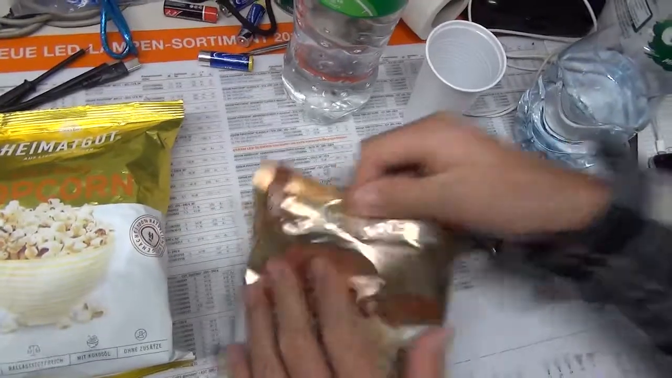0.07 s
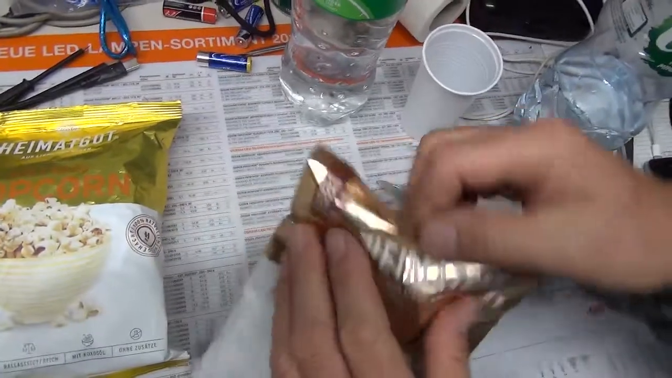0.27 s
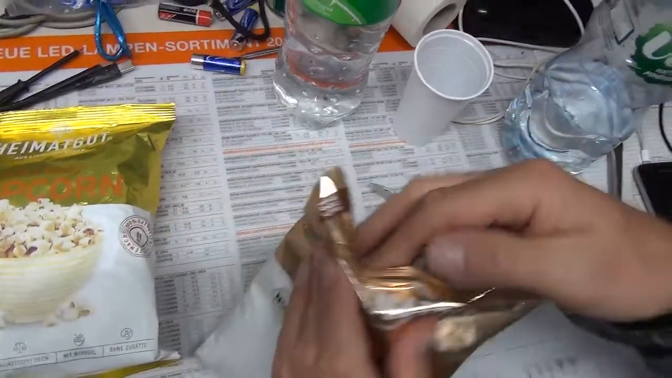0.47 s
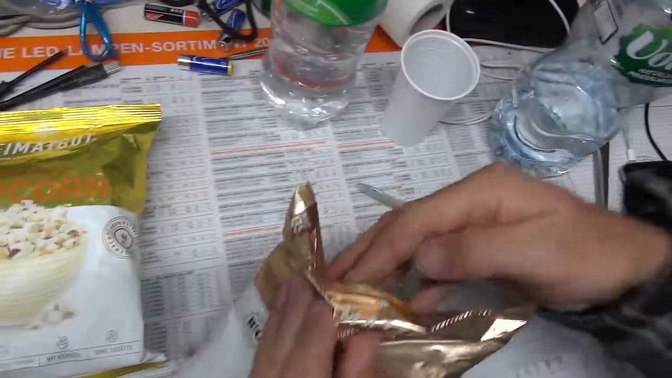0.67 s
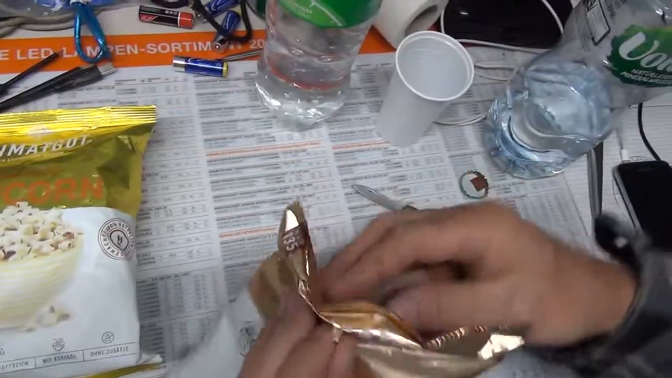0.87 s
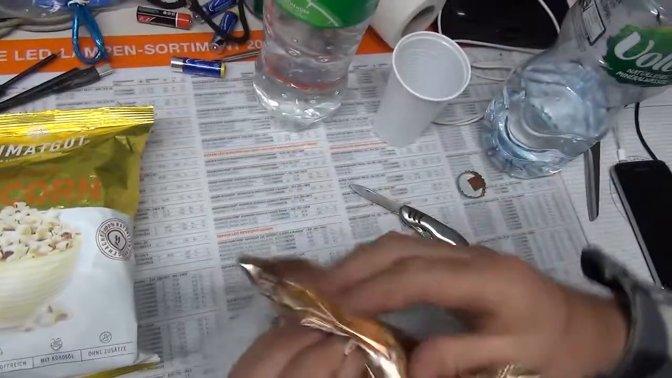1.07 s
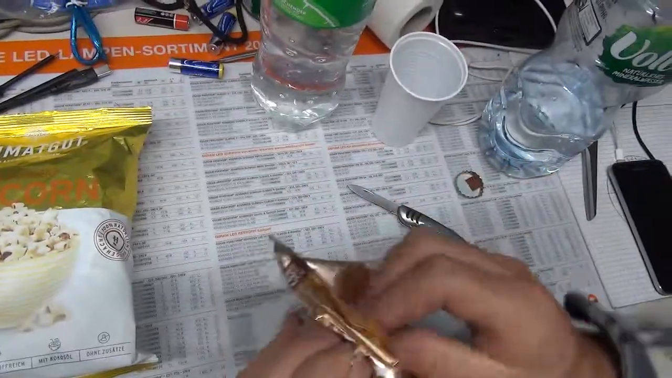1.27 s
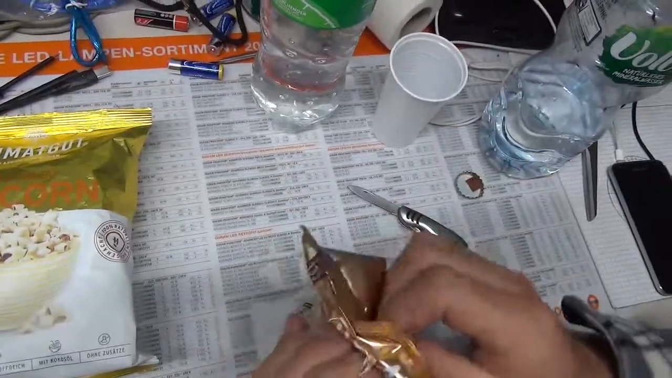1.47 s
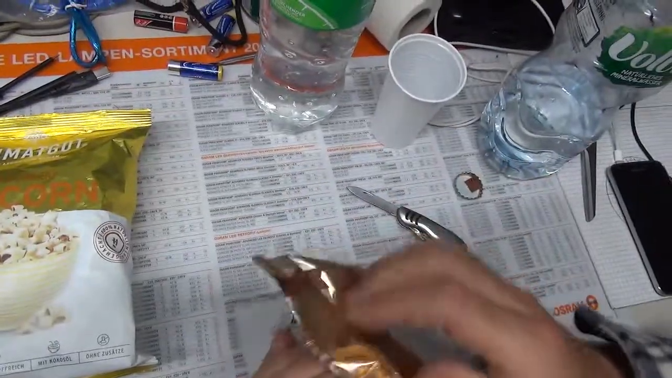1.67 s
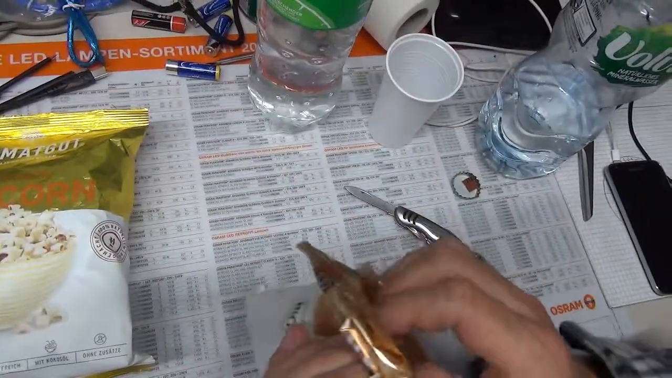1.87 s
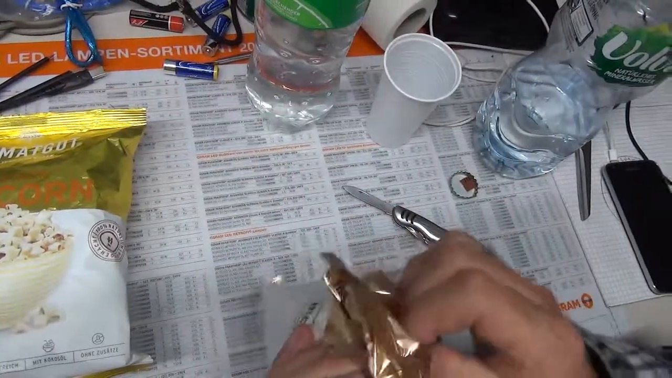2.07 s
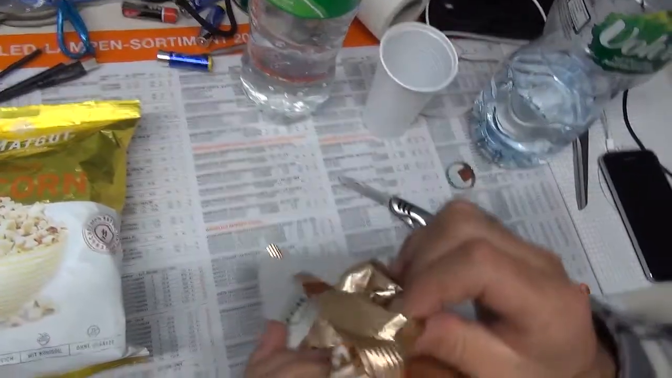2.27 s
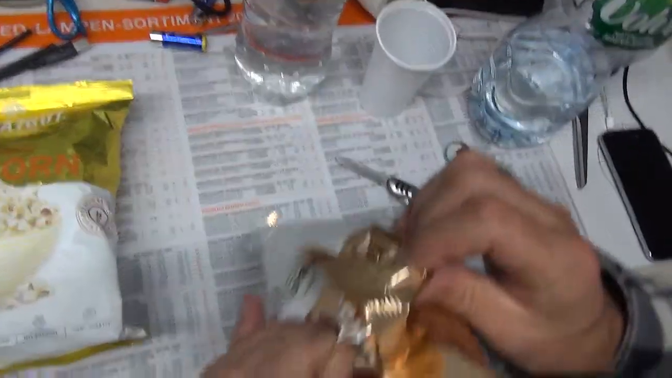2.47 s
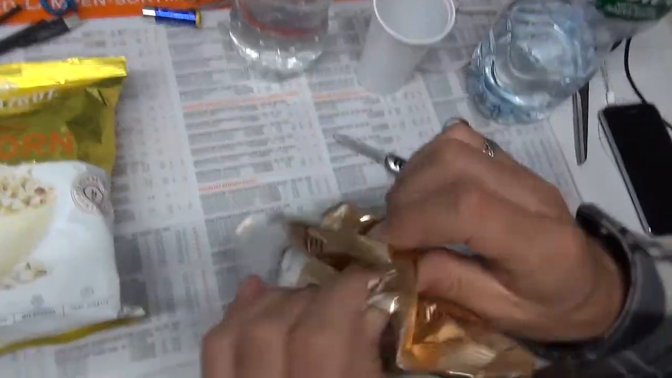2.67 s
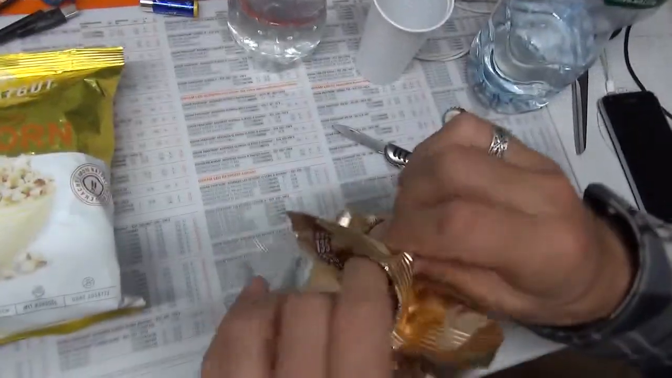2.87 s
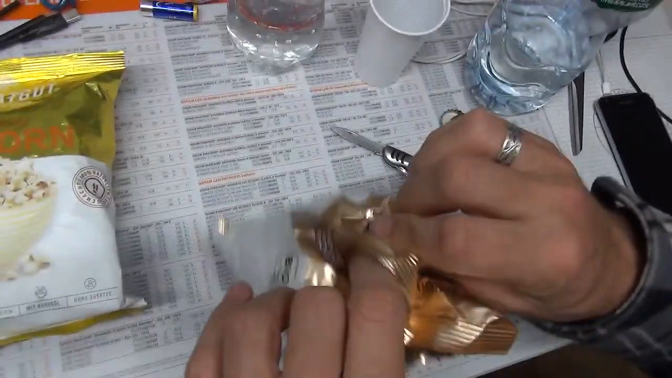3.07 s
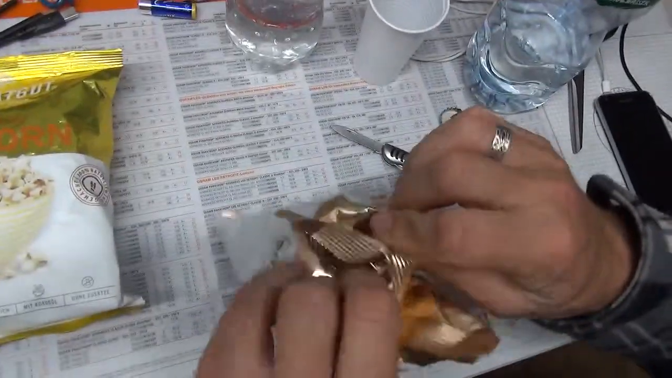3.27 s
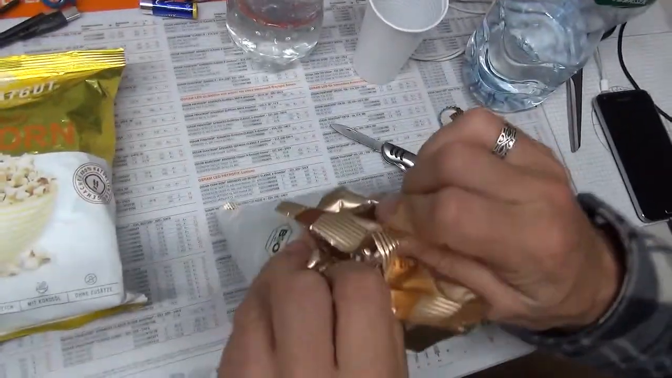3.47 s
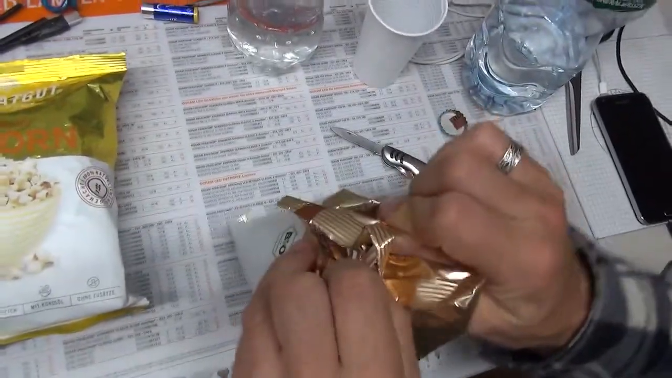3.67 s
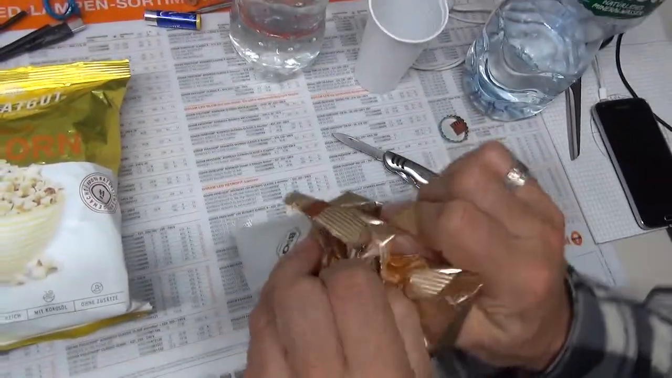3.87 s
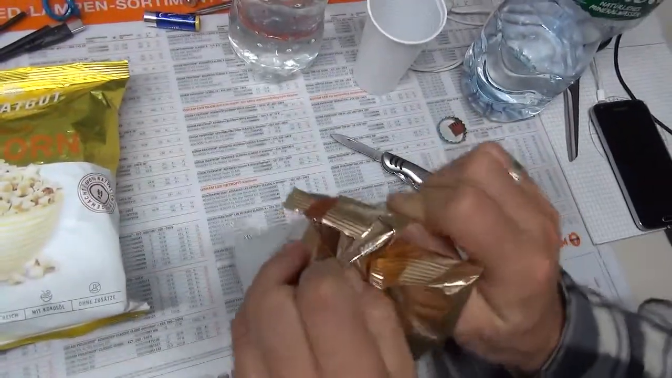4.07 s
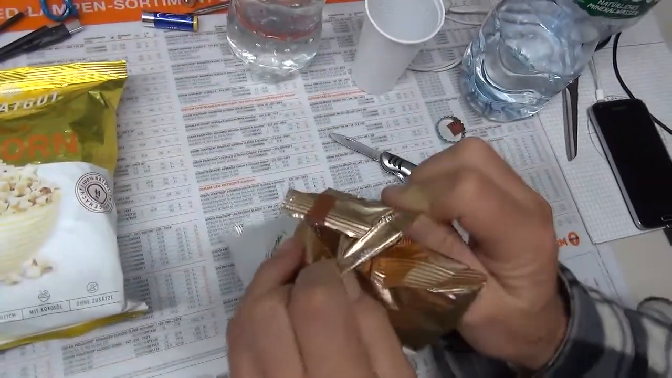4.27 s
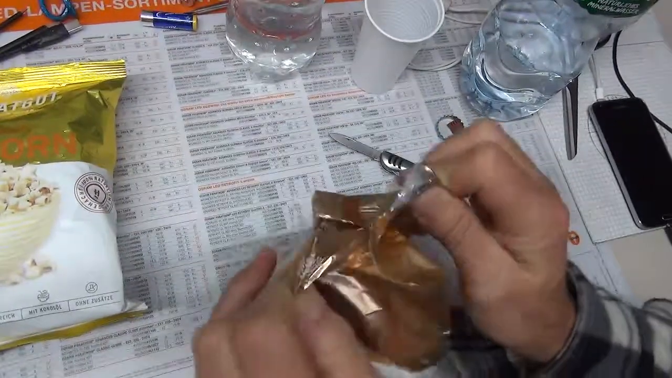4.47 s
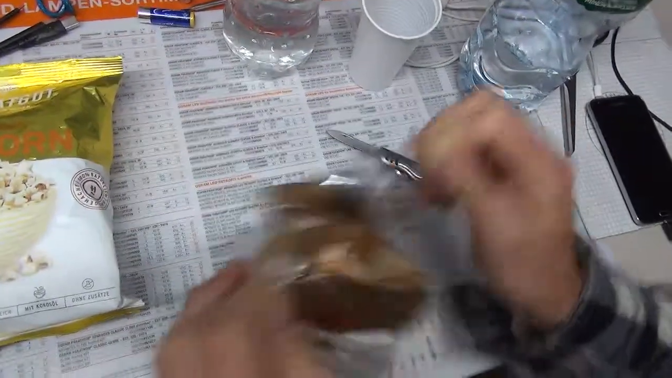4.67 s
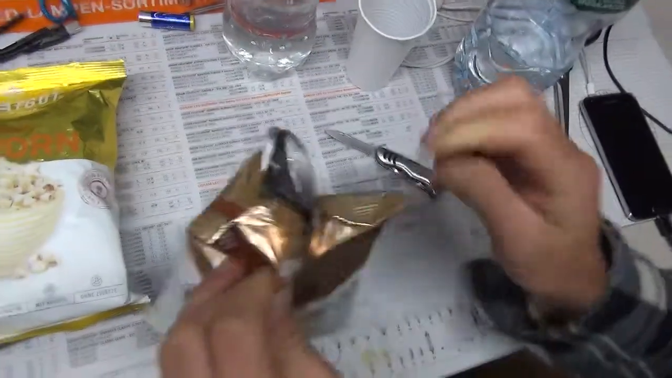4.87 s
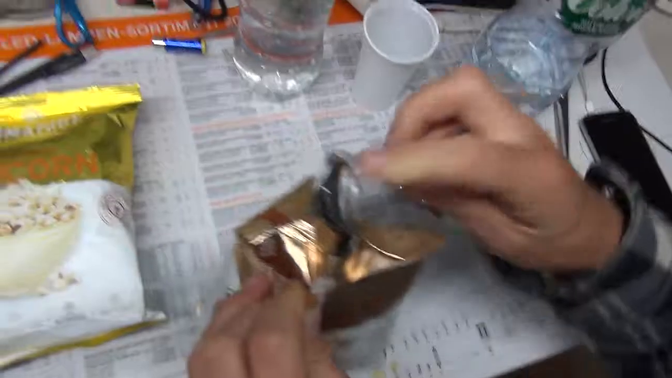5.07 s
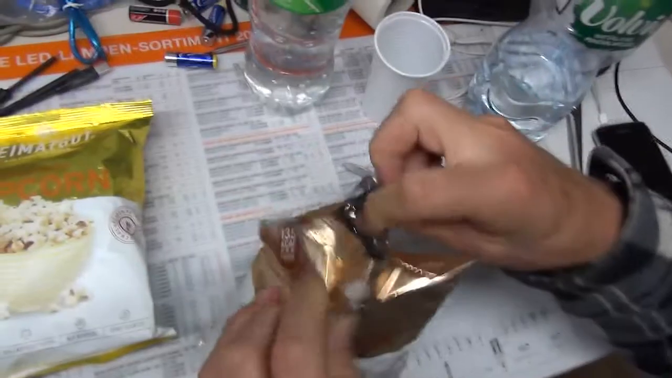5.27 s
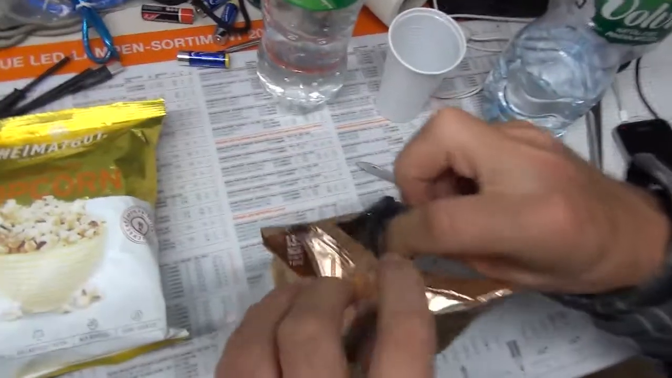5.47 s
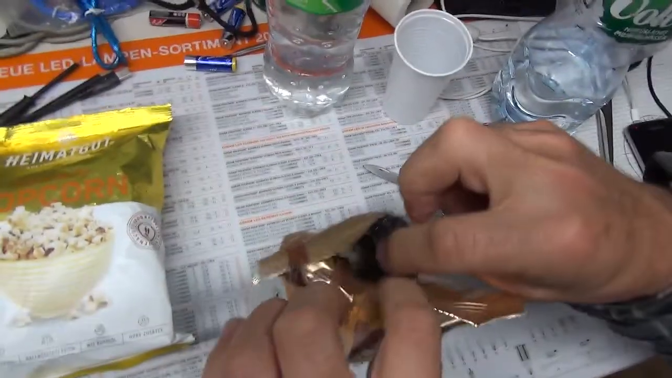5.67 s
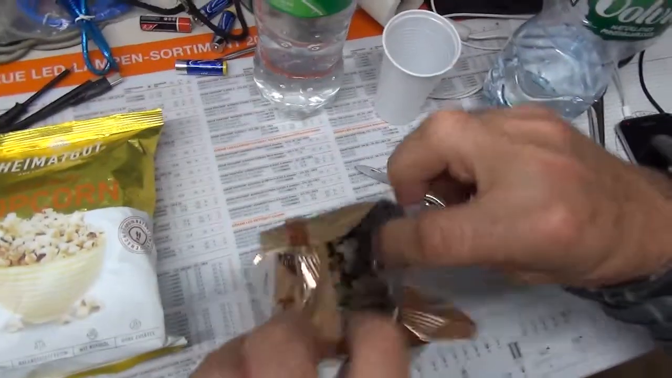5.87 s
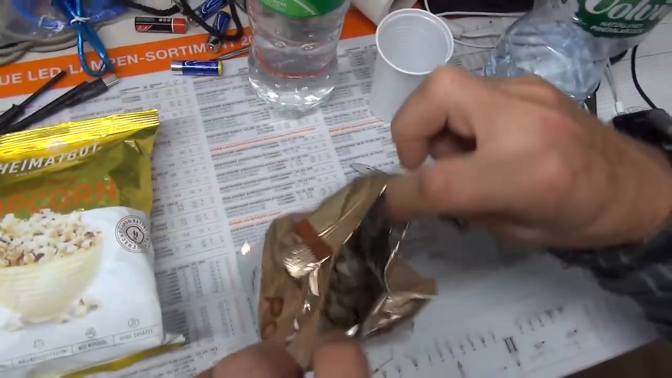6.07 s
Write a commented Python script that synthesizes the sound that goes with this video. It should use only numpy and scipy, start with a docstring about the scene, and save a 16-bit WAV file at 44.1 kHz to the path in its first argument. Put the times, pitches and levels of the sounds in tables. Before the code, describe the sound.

Close, crisp crinkling of a foil bag being squeezed and pulled open by hand, with small dull pops, in a quiet room.

```python
"""Crumpling a foil bag

Two hands crumple and open a metallised foil bag on a table, close by. Creases snap over in clumps,
each with its own colour and a short rattle, over the hiss of sliding foil. Larger panels pop dully
and knuckles bump the table. A small furnished room answers above its quiet background."""
import sys
import numpy as np
from scipy import signal
from scipy.fft import rfft, irfft
from scipy.io import wavfile
from scipy.ndimage import uniform_filter1d

SR = 44100
rng = np.random.default_rng(int(sys.argv[2]) if len(sys.argv) > 2 else 0)


def generate_wav(sig):
    """Save sig (samples, or channels by samples) to the path in sys.argv[1] as 16-bit PCM at SR."""
    pcm = np.round(np.clip(np.atleast_2d(sig).T, -1, 1) * 32767).astype(np.int16)
    wavfile.write(sys.argv[1], SR, pcm)


N = 270492

# Bag panels popping in or out: start_s, level_db, pitch_hz
PANEL_POPS = [(0.051, -16.5, 211), (0.0875, -14, 478), (0.1174, -14, 1940), (0.151, -18, 457),
              (0.2072, -17, 194), (0.2493, -16, 1320), (0.262, -16, 620), (0.3586, -14, 459.3),
              (0.9267, -18, 1945), (1.0403, -15.5, 415.4), (1.4214, -24, 2433), (1.8145, -19, 1489),
              (1.9084, -13, 660.5), (1.928, -16, 592.5), (2.086, -15.5, 663), (2.2359, -20.5, 190.6),
              (2.2926, -16, 176), (2.3758, -17, 325.7), (2.3971, -15.5, 190.5), (2.437, -17.5, 355),
              (2.49, -20, 3036), (2.5239, -14, 2570), (2.602, -18, 2088), (2.6547, -18.5, 149.3),
              (2.7419, -18, 2676), (2.9994, -18, 410.4), (3.012, -20, 1345), (3.1538, -14, 1449),
              (3.294, -14.5, 279.6), (3.3788, -18.5, 2832), (3.424, -13, 322.3), (3.4326, -16, 2870),
              (3.516, -21, 1509), (3.5448, -19, 1596), (3.546, -13, 463.2), (3.6585, -15.5, 742),
              (3.6848, -11, 641), (3.7239, -18, 3360), (3.8072, -17, 1940), (3.8086, -15.5, 373.2),
              (3.835, -17, 371), (3.8433, -14.5, 1329), (3.9861, -14, 3285), (4.071, -11.5, 2066),
              (4.212, -16, 336), (4.3223, -18.5, 209.6), (4.424, -13.5, 1309), (4.4351, -21, 145.6),
              (4.5787, -18.5, 1523), (4.815, -14.5, 1640), (4.818, -17, 239.8), (4.9612, -16.5, 190.8),
              (5.1419, -18, 1348), (5.2758, -22, 1367), (5.4415, -23, 153.2), (5.447, -15.5, 2090),
              (5.66, -17, 2260), (5.664, -24, 149.3), (5.8878, -20, 193.2), (5.96, -20, 170.9)]
# Hand action, sliding to pulling: time_s, snaps_per_s, avalanche_share, slide_db, size_range_db
HAND_GRIP = [(0, 1416, 0.25, -3, 20), (1.5, 1400, 0.3, -3.5, 19), (3, 650, 0.6, -6, 19),
             (4, 600, 0.65, -6, 18), (5.0, 1100, .6, 0, 10), (5.6, 1300, .6, 3, 9),
             (6.13, 800, 0.5, -2, 18)]

SIDE_DB, BASS_SIDE_HZ = -13.5, 69  # stereo width; snaps widen towards the bass


def from_db(db):
    """dB to gain."""
    return 10 ** (np.asarray(db) / 20)


def colour(x, spectrum):
    """Unit-energy minimum-phase filter from rows of freq_hz, level_db."""
    hz, db = np.transpose(spectrum)
    grid_hz = np.linspace(1, SR / 2, 4097)
    cepstrum = irfft(np.interp(np.log(grid_hz), np.log(hz), db) * np.log(10) / 20)
    cepstrum[1:4096] *= 2
    cepstrum[4097:] = 0
    kernel = irfft(np.exp(rfft(cepstrum)))[:4096]
    return signal.fftconvolve(x, kernel[None] / np.linalg.norm(kernel), axes=1)[:, :N]


def butterworth(x, order, edges_hz, kind):
    """Causal Butterworth filter."""
    return signal.sosfilt(signal.butter(order, edges_hz, kind, fs=SR, output="sos"), x)


def background():
    """Steady room noise, strongest near 950 Hz. Rows: left, right."""
    # Room noise spectrum: freq_hz, level_db
    spectrum = [(18, -68), (30, -36), (802, 0), (953, 6.5), (1250, -8), (1640, -17), (3620, -17),
                (11000, -12), (14300, -33), (22000, -120)]
    mid, side = colour(rng.standard_normal((2, N)), spectrum)
    return from_db(-53.5) * (mid + 0.43 * side * [[1], [-1]])


def room(x, t60_s=0.25, level_db=-18, gap_s=0.003):
    """Diffuse reflections: a tail of decaying noise."""
    time = np.arange(SR // 2) / SR
    tail = rng.standard_normal(len(time)) * from_db(-60 * time / t60_s) * (time > gap_s)
    return signal.fftconvolve(x, from_db(level_db) * tail / np.linalg.norm(tail))[:N]


def table_bumps(contact_s=0.002):
    """Each soft contact pushes the table with one rounded pulse."""
    # Hands and bag meeting the table top: start_s, level_db
    contacts = [(0.049, -41), (0.805, -36), (1.236, -36), (2.582, -43), (2.689, -47), (3.428, -49),
                (3.696, -45), (3.862, -46), (3.939, -43), (4.019, -44), (4.414, -40)]
    start_s, level_db = np.transpose(contacts)
    impulses = np.zeros(N)
    impulses[(start_s * SR).astype(int)] = from_db(level_db)
    age = np.arange(2000) / SR / contact_s
    push = np.convolve(impulses, age * np.exp(1 - age))[:N]
    return 2 * butterworth(push, 1, 35, "high")


def panel_pops(overtone_ratio=2.264, overtone_db=-7.5, crack_db=-8, crack_s=0.0015):
    """A panel flips: its fold cracks and it rings a few cycles at its own pitch."""
    length = 4000
    out, time = np.zeros(N + length), np.arange(length) / SR
    cracks = butterworth(rng.standard_normal((len(PANEL_POPS), length)), 2, [600, 6000], "band")
    cracks *= from_db(crack_db) * np.exp(-time / crack_s)
    for (start_s, level_db, pitch_hz), crack in zip(PANEL_POPS, cracks):
        cycles = pitch_hz * time
        phase = 2 * np.pi * (cycles + 0.17 * (1 - np.exp(-cycles / 0.29)))  # tension drops after the flip
        ring = np.sin(phase) + from_db(overtone_db) * np.sin(overtone_ratio * phase)
        t60_s = 5 / pitch_hz + 0.009
        envelope = (1 - np.exp(-cycles / 0.15)) * from_db(-60 * time / t60_s)
        at = round(start_s * SR)
        out[at:at + length] += from_db(level_db) * (envelope * ring + crack)
    return butterworth(out[:N], 2, 100, "high")  # a small bag radiates no deep bass


def handling(ramp_s=0.0077, mean_crackle_db=-14.5, low_fade_db_per_s=0.7156):
    """Hand effort over time: crackle level, lift of the lower bands, squeezes' part of the level."""
    # How busy the hands are: time_s, level_db
    effort = [(0, -14.5), (0.48, -17), (0.56, -24), (0.8, -21), (0.9, -16.5), (2.0, -14.5), (2.9, -18),
              (3.3, -19.5), (3.95, -20.5), (4.05, -20), (4.5, -28.5), (4.75, -20), (4.98, -32.5),
              (5.2, -29), (5.42, -27.5), (5.6, -33), (5.78, -23), (6.13, -16)]
    # Squeezes crushing many creases at once: start_s, length_s, rise_db
    squeezes = [(1.0, 0.12, 3), (1.215, 0.054, 2), (1.36, 0.067, 4), (1.905, 0.041, 3), (2.01, .035, 3.5),
                (2.28, 0.043, 3), (2.775, 0.065, 5.5), (3.07, 0.066, 7), (3.215, 0.048, 9.5),
                (3.79, 0.027, 6.5), (3.89, 0.093, 5), (4.322, .11, 12.5), (4.66, 0.031, 3),
                (4.806, .014, 9), (5.445, 0.0052, 7.5), (5.66, 0.017, 5)]
    # Foil held still: start_s, length_s, drop_db
    rests = [(0.125, 0.02, 9), (0.788, 0.034, 5), (1.5, 0.044, 11.5), (1.635, 0.02, 5.5), (2.056, 0.022, 5),
             (2.164, 0.044, 7), (2.24, 0.022, 7), (2.415, 0.027, 8), (2.749, 0.0092, 3),
             (2.846, 0.037, 6.5), (2.99, 0.018, 3), (3.022, 0.032, 8.5), (4.558, 0.0077, 18),
             (4.862, 0.018, 13), (5.007, 0.13, 17), (5.723, 0.033, 11), (6.034, 0.027, 7),
             (6.089, .008, 12)]
    time = np.arange(N) / SR

    def plateaus(rows):
        return sum(db * np.interp(time, [s - ramp_s, s, s + length, s + length + ramp_s], [0, 1, 1, 0])
                   for s, length, db in rows)

    squeeze_db = plateaus(squeezes)
    crackle_db = np.interp(time, *np.transpose(effort)) + squeeze_db - plateaus(rests)
    # Lower bands fade as the bag gets smaller, and follow only part of each swing.
    lift_db = -0.22 - low_fade_db_per_s * time
    lift_db -= 0.41 * (crackle_db - mean_crackle_db) + 0.1 * squeeze_db
    return crackle_db, lift_db, squeeze_db


def avalanches(trigger_at, random_per_s=32, decay_s=0.0065):
    """One buckle sets off its neighbours: the snap rate jumps, then decays. Mean 1."""
    starts = 1.0 * (rng.random(N) < random_per_s / SR)
    starts[trigger_at] = 1
    surge = signal.lfilter([1], [1, -np.exp(-1 / (decay_s * SR))], starts)
    return surge / surge.mean()


def creases(ticks=3, run_s=0.002, loud_drive_db=13, crackle_drive_db=1.5, spread_db=6.5):
    """Creases buckle: loud snaps amid random crackle. Per snap: sample, size, bright_hz, lift_db."""
    # Loudest crease snaps: start_s, level_db
    loud_snaps = [(0.0214, -0.5), (0.1165, -5), (0.1537, -8), (0.192, -5), (0.2447, 1), (0.3507, -2),
                  (0.3792, 3), (0.3883, -7), (0.4053, -6), (0.4387, 3), (0.4817, -8), (0.4945, -12),
                  (0.5023, -10), (0.5602, -11), (0.5723, 1.5), (0.5951, 0), (0.6205, -8), (0.7155, -1),
                  (0.782, 1), (0.827, 5), (0.8546, -6), (0.9108, -2), (0.9328, 1.5), (1.0256, -9),
                  (1.0979, -3), (1.1623, -12), (1.1806, -6), (1.2251, 0), (1.3515, -13), (1.3698, -16),
                  (1.4427, -3), (1.5125, -9), (1.5343, -7), (1.5461, -9), (1.5743, -2), (1.6586, -2),
                  (1.7523, -11), (1.8139, -6), (1.8811, -6), (2.0103, -9), (2.0762, -6), (2.1011, -5),
                  (2.122, -9), (2.1685, -3), (2.2053, -3), (2.2329, -6), (2.2571, -5.5), (2.2757, -11),
                  (2.3081, -5), (2.366, -10), (2.3957, -9), (2.4333, -2), (2.491, -3), (2.5441, -8),
                  (2.5688, -3), (2.59, 2), (2.6976, 1.5), (2.724, 5), (2.7413, -6), (2.7644, -5),
                  (2.8583, -4.5), (2.8756, -11), (2.892, 1), (2.9442, 1), (2.9617, -6), (3.0117, -11),
                  (3.0173, -9), (3.0545, -13), (3.1707, -5.5), (3.1963, -5), (3.2853, 1), (3.3297, -17),
                  (3.374, -9), (3.4011, 2.5), (3.4479, 3), (3.465, -14), (3.4779, -0.5), (3.4912, -6),
                  (3.5797, -6), (3.5932, -7), (3.6177, 5.5), (3.6826, -2), (3.706, -11), (3.7241, -3),
                  (3.7405, -10), (3.7781, -9.5), (3.8421, -10), (3.8679, -11), (3.8823, -0.5), (3.906, -3),
                  (3.9496, -7), (3.9851, -3.5), (4.0336, -3), (4.07, -8), (4.1072, -15), (4.133, -3.5),
                  (4.1721, -8), (4.2098, 0), (4.2381, -19), (4.2601, -18), (4.2835, 2), (4.3151, -6),
                  (4.3407, -7), (4.3684, -5), (4.3885, -10), (4.4777, -5), (4.4885, -7), (4.5176, -10.5),
                  (4.5778, -1), (4.6599, -7), (4.6686, -3), (4.6805, -6), (4.726, -3), (4.758, 0),
                  (4.7654, -3), (4.8471, -7), (4.886, -2), (4.9265, -17), (4.9442, -12), (4.9807, -20),
                  (5.1438, -11), (5.2412, -15), (5.249, -1.5), (5.2755, -10), (5.3055, 1), (5.3332, -15),
                  (5.3512, -7), (5.3925, -4), (5.4298, 2.5), (5.4625, -9), (5.5032, -16), (5.5428, -14),
                  (5.5482, -7), (5.6296, -3.5), (5.6482, 0), (5.665, -0.5), (5.7029, -6), (5.7306, -3),
                  (5.7884, 4), (5.8058, -3), (5.8312, 2), (5.8515, -1), (5.9103, -3), (5.9816, -3),
                  (6.0661, -12), (6.1, -2)]
    time = np.arange(N) / SR
    crackle_db, lift_db, squeeze_db = handling()
    grip_s, *grip = np.transpose(HAND_GRIP)
    snaps_per_s, avalanche_share, _, range_db = (np.interp(time, grip_s, column) for column in grip)

    # A loud snap runs along its crease in a few ticks, the later the weaker.
    along = (rng.random((len(loud_snaps), ticks)) * (np.arange(ticks) > 0)).ravel()
    start_s, level_db = np.repeat(loud_snaps, ticks, axis=0).T
    tick_at = ((start_s + run_s * along) * SR).astype(int)
    tick_sizes = from_db(level_db - 14 * along + loud_drive_db)
    loud_at = tick_at[::ticks]

    pop_at = (np.transpose(PANEL_POPS)[0] * SR).astype(int)
    surge = avalanches(np.r_[loud_at, pop_at])
    density = from_db(0.7 * squeeze_db)  # a squeeze adds an even stream of snaps
    rate_per_s = snaps_per_s * (density - avalanche_share + avalanche_share * surge)
    at = np.flatnonzero(rng.random(N) < rate_per_s / SR)
    size_db = np.minimum(rng.exponential(spread_db, N), range_db + squeeze_db / 2)[at]
    sizes = from_db(size_db)
    power = (snaps_per_s * density)[at] / SR * uniform_filter1d(sizes ** 2, size=1000)
    sizes *= from_db(crackle_db[at] + crackle_drive_db) / np.sqrt(power)  # fewer snaps are larger

    bright_hz = np.exp(rng.uniform(np.log(4000), np.log(11000), N))
    bright_hz = bright_hz[np.r_[np.repeat(loud_at, ticks), at]]  # ticks of one snap share a colour
    # Harder snaps are thinner: less reaches the lower bands.
    snap_lift_db = np.r_[lift_db[tick_at] - 7, lift_db[at] + 0.4 * (2 * spread_db - size_db)]
    return np.r_[tick_at, at], np.r_[tick_sizes, sizes], bright_hz, snap_lift_db


def facets(at, sizes, level_db=-18, spread_db=4):
    """Each snap briefly rings one foil facet at a random pitch. Rows: mid, side."""
    pitches_hz = np.geomspace(90, 4800, 28)
    facet = rng.integers(0, len(pitches_hz), N)[at]
    scatter, pan = rng.standard_normal((len(at), 2)).T
    sizes = sizes * from_db(level_db + spread_db * scatter)
    out = np.zeros((2, N))
    for k, hz in enumerate(pitches_hz):
        clicks, struck = np.zeros((2, N)), facet == k
        side = sizes * from_db(SIDE_DB) * (1 + BASS_SIDE_HZ / hz) * pan
        clicks[:, at[struck]] = sizes[struck], side[struck]
        t60_s = 3.5 / hz + 0.003
        radius, angle = from_db(-60 / (t60_s * SR)), 2 * np.pi * hz / SR
        feedback = [1, -2 * radius * np.cos(angle), radius ** 2]
        out += np.sqrt(hz / 1000) * signal.lfilter([0, np.sin(angle)], feedback, clicks + 1e-18)
    return out


def foil(split_hz=3500, spread_db=2.5, rattle_s=0.00085, rattle_db=-17.5, slide_treble_db=-6):
    """Snaps excite all bands; the freed foil rattles over the hiss of sliding. Rows: mid, side."""
    # Overall colour of the sound: freq_hz, level_db
    spectrum = [(18, -80), (30, -30), (108, -20), (196, -6), (422, -4.5), (540, -6.5), (658, -3.5),
                (1000, -8), (1450, -4), (4750, -8), (5250, -5), (5750, 0.5), (6550, 2), (9480, 0.5),
                (11000, -2), (22000, 12)]
    at, sizes, bright_hz, snap_lift_db = creases()
    crackle_db, slide_lift_db, _ = handling()
    grip_s, _, _, slide_db, _ = np.transpose(HAND_GRIP)
    slide = from_db(crackle_db + np.interp(np.arange(N) / SR, grip_s, slide_db) + [[0], [SIDE_DB]])
    slide_low, slide_high = slide * from_db(slide_lift_db), slide * from_db(slide_treble_db)
    rattle_pole = np.exp(-1 / (rattle_s * SR))
    out = facets(at, sizes * from_db(snap_lift_db))
    polarity = rng.choice([-1, 1], len(at))  # a crease snaps in or out
    edges_hz = 40 * 2 ** np.arange(0, 8.6, 0.5)
    for k, (low_hz, high_hz) in enumerate(zip(edges_hz, edges_hz[1:])):
        hz = np.sqrt(low_hz * high_hz)
        if hz > split_hz:
            octaves_off = np.abs(np.log2(hz / bright_hz))
            gain_db, hiss = np.maximum(3 - 20.2 * octaves_off, -11), slide_high
        else:
            gain_db, hiss = snap_lift_db - 8, slide_low
        scatter, pan = rng.standard_normal((len(at), 2)).T
        band_sizes = sizes * from_db(gain_db + spread_db * scatter)
        clicks = np.zeros((2, N))
        np.add.at(clicks[0], at, band_sizes * polarity * (-1) ** k)
        np.add.at(clicks[1], at, band_sizes * from_db(SIDE_DB) * (1 + BASS_SIDE_HZ / hz) * pan)
        rattle = signal.lfilter([from_db(rattle_db)], [1, -rattle_pole], np.abs(clicks))
        noise = (rattle + hiss) * rng.standard_normal((2, N))
        out += butterworth(clicks + noise + 1e-18, 2, [low_hz, high_hz], "band")
    return colour(out, spectrum)


def scene(balance_db=-0.9):
    """Foil, pops and bumps in the room, over its background. Rows: left, right."""
    mid, side = foil()
    mid = mid + panel_pops() + table_bumps()
    room_noise = background()
    left_right = np.array([[1], [-1]])
    return (mid + side * left_right + room(mid)) * from_db(left_right * balance_db / 2) + room_noise


def record(dry, ceiling=0.85, step_hz=11300, step_db=30, cutoff_hz=12333):
    """Peaks are rounded; the treble steps down, then is cut off."""
    rounded = ceiling * np.tanh(dry / ceiling)
    stepped = signal.sosfilt(signal.cheby2(16, step_db, step_hz, fs=SR, output="sos"), rounded)
    return signal.sosfilt(signal.ellip(8, 0.5, 55, cutoff_hz, fs=SR, output="sos"), stepped)


dry = scene()
out = record(dry)
generate_wav(out)
```